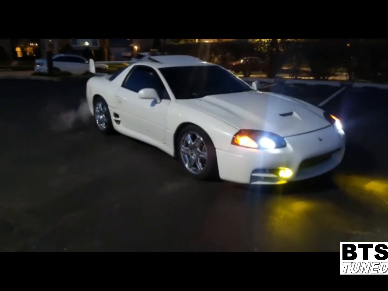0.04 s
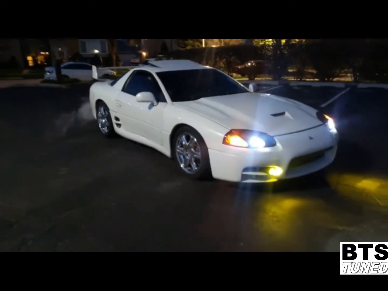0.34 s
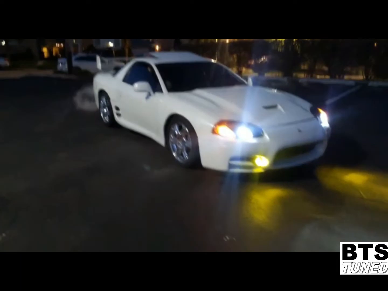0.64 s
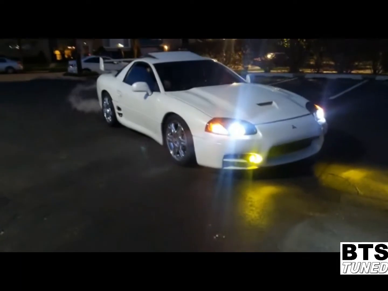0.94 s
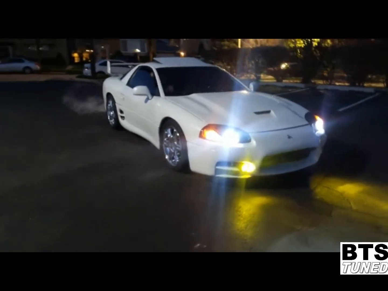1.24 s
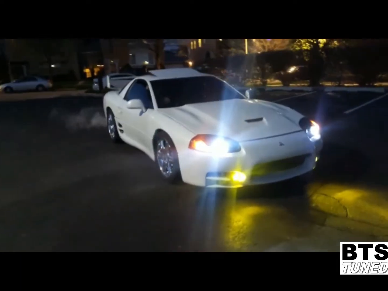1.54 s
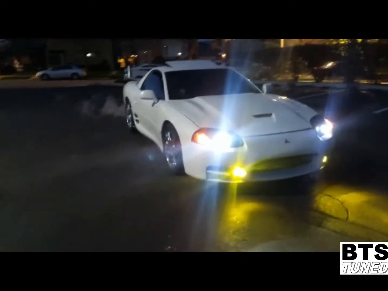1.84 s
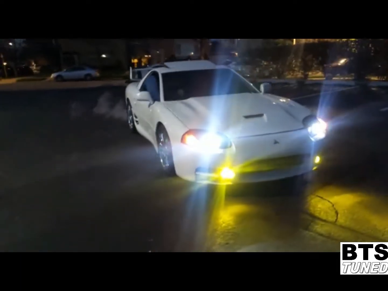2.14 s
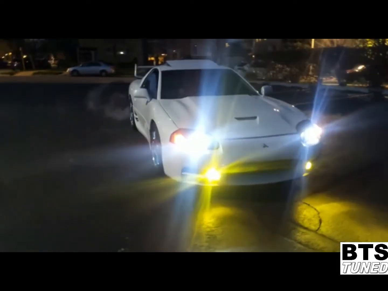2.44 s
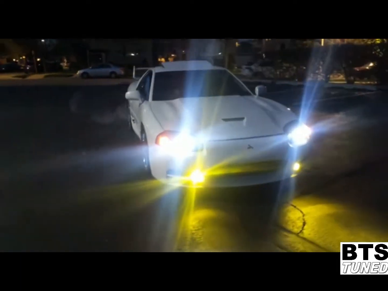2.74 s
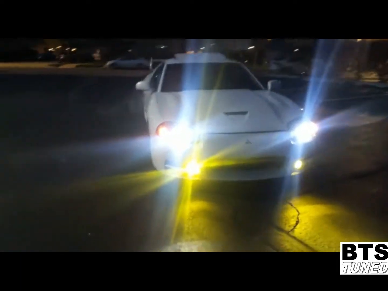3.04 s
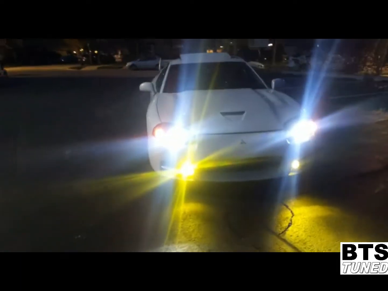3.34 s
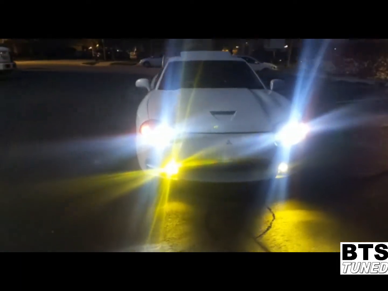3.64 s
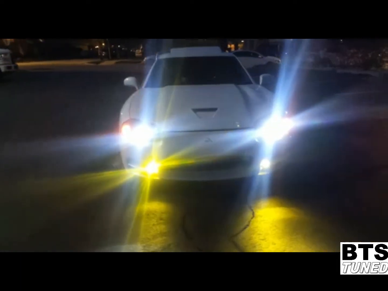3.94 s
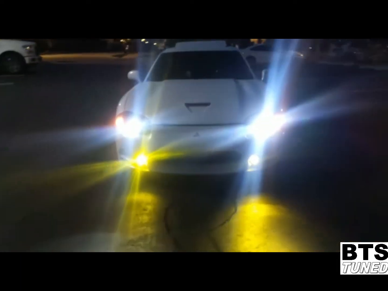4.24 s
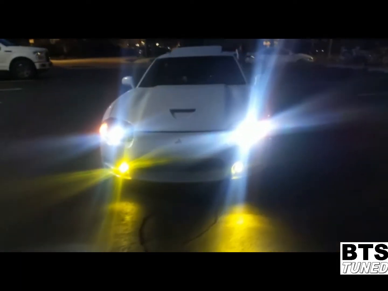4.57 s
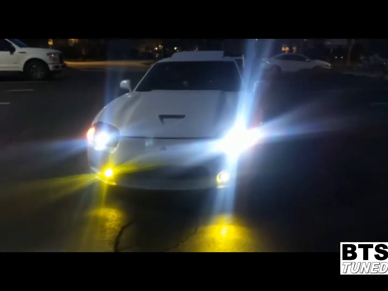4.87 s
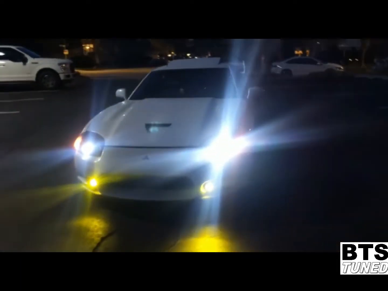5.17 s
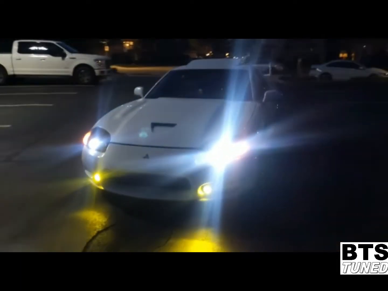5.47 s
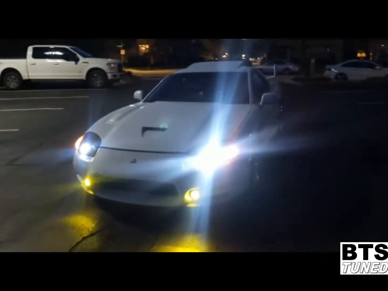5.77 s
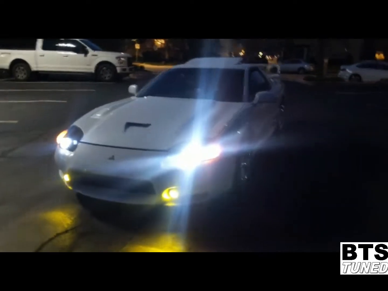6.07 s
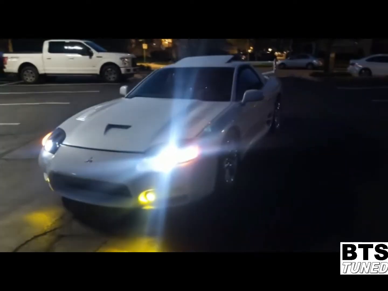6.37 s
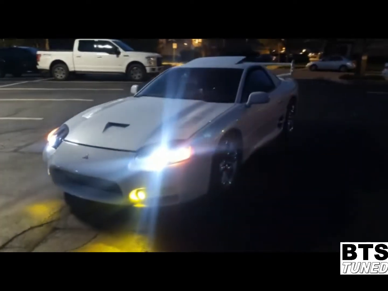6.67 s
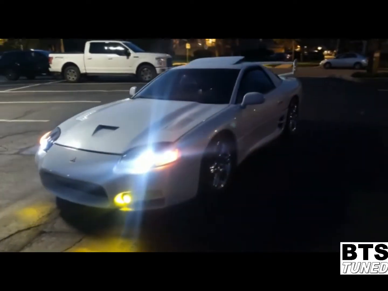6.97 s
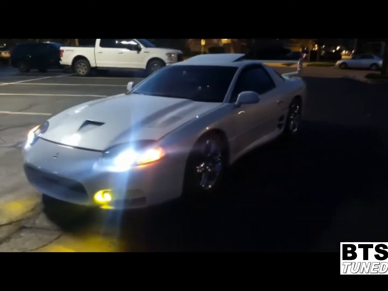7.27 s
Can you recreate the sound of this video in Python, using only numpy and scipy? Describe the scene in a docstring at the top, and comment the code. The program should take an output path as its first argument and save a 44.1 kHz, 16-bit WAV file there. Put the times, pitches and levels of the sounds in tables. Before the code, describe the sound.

A deep, throbbing exhaust drone runs throughout as a parked coupe idles in a parking lot, its speed wavering only slightly. Lighter mechanical whirring and a ticking hiss sit over the low burble. As the close microphone circles the front of the car, a dull tapping and then a faint high whistle come and go, and the boom grows a little fuller on the far side.

```python
"""The boom and lumpy burble of a turbo V6 on fast idle, warming up in a car park.
The exhaust booms at the firing rate and burbles because the two banks and six cylinders blow unequally.
Over it the engine bay rustles and taps with each crank turn, the valve gear ticks, and belts and fan
whine faintly. The tone shifts as the listener walks round the nose, from one flank to the other."""
import sys
import numpy as np
from scipy import signal
from scipy.fft import rfft, irfft
from scipy.io import wavfile
from scipy.ndimage import uniform_filter1d, map_coordinates

SR = 44100
rng = np.random.default_rng(int(sys.argv[2]) if len(sys.argv) > 2 else 0)


def transcribe(signal):
    """Save signal, clipped to [-1, 1], as a 16-bit WAV file at the path in sys.argv[1]."""
    frames = np.atleast_2d(signal).T
    limited = np.clip(frames, -1, 1)
    pcm = np.round(limited * 32767).astype(np.int16)
    wavfile.write(sys.argv[1], SR, pcm)


N = 326781
T = np.arange(N) / SR
CYLINDERS = 6

# the walk round the car: time_s, place (0 near flank, 1 nose, 2 far flank)
LISTENER_PATH = [(0, 0), (1.9, 0), (2.7, .3), (3.2, .9), (4.65, 1.05), (5.8, 2)]
# the mix at near flank, near corner, nose, far corner, far wing, far front wheel and far flank:
# time_s, firing_db, octave_db, burble_trim_db, bay_db, valve_db
SIDE_MIX = [(.8, -30, -21, 1.7, -41.5, -61.5), (2.2, -27, -22, -0.5, -40.5, -56.5),
            (4.1, -30.7, -21, 1.5, -39.5, -54.5), (5.2, -26.5, -23, -2.8, -39.5, -54),
            (5.65, -30.5, -25, 0.9, -39.5, -54.5), (6.2, -25.5, -19.5, -0.1, -40, -54),
            (7.3, -26, -19.5, 2.5, -40.5, -55)]


def exhaust(cycle, cycle_hz, waver_db=.6, waver_per_s=3.6):
    """Clean boom, lumpy burble, and the rumble of firings that are never alike."""
    # the third firing harmonic, droning on the silencer's resonance: time_s, level_db
    drone = [(0.0, -15), (0.54, -15), (0.76, -18.2), (1.15, -13.5), (1.38, -19.5), (1.5, -14),
             (2.12, -16.5), (2.17, -22.5), (2.55, -14.5), (3.48, -17.5), (3.88, -25), (4.95, -22.5),
             (5.04, -33), (5.4, -27.5), (5.54, -18.5), (5.76, -22.5), (5.94, -16), (7.41, -17.5)]
    # the pipe's response to uneven firings: frequency_hz, relative_db
    pipe_eq = [(10, -22), (35, -5.5), (70, -5.5), (110, 1), (150, 3.5), (190, -5.5), (220, -1.5),
               (280, -4.5), (335, -3), (390, -12.5), (470, -19), (700, -30.5)]
    firing_db, octave_db, *_ = curves(SIDE_MIX)
    drift_db = waver_db * wander(waver_per_s)
    harmonics_db = [firing_db + drift_db, octave_db + drift_db, curves(drone)[0]]
    boom = sum(undb(db) * pipe_harmonic(cycle, CYLINDERS * k, cycle_hz)
               for k, db in enumerate(harmonics_db, 1))
    uneven_firings = unit(pulses(CYLINDERS * cycle, rng.standard_normal(N)))
    rumble = undb(-31.5) * colour(uneven_firings + 2 * rng.standard_normal(N), pipe_eq)
    return boom + burble(cycle, cycle_hz) + rumble


def burble(cycle, cycle_hz):
    """Unequal banks and cylinders fill in between the firing harmonics; neighbours beat and throb."""
    # burble partials before the trim: {multiple of the cycle: (near_flank_db, nose_db, far_flank_db)}
    partials = { 3: (-52, -51, -51), 9: (-54, -42, -47), 13: (-43, -46, -46), 15: (-38.5, -30, -32),
                16: (-46, -45, -38), 17: (-45.5, -53, -48), 19: (-38, -45, -43), 20: (-45, -43, -40),
                21: (-48, -44, -41), 24: (-44.5, -29.5, -36), 25: (-34.5, -31.5, -34.5),
                26: (-41.5, -48, -50), 27: (-43, -38, -47), 30: (-36, -34, -35), 31: (-48, -44, -45),
                33: (-55.5, -65, -44), 36: (-45.5, -45, -49), 37: (-53, -52, -48.5),
                38: (-49.5, -58.5, -52.5), 39: (-48.5, -55.5, -50), 42: (-51.5, -53, -44.5),
                43: (-53.5, -47, -55), 45: (-48.5, -52, -59.5)}
    place = curves(LISTENER_PATH)[0]
    _, _, trim_db, *_ = curves(SIDE_MIX)
    out = 0
    for order, levels in partials.items():
        db = np.interp(place, [0, 1, 2], levels) + wander(4)
        # one bank's three firings line up in thumps; single cylinders arrive by paths of any length
        lag_cycles = rng.random() if order % (CYLINDERS // 2) else 0
        out = out + undb(db) * pipe_harmonic(cycle - lag_cycles, order, cycle_hz)
    return undb(trim_db) * out


def pipe_harmonic(cycle, order, cycle_hz, silencer_hz=151, silencer_q=1.18):
    """One exhaust harmonic of rms 1, phase-shifted by the silencer's main resonance."""
    ratio = order * cycle_hz / silencer_hz
    phase_lag = np.arctan(silencer_q * (ratio - 1 / ratio))
    # past the nose the path round the far flank takes over: upper harmonics flip, the chug smooths out
    detour = np.interp(curves(LISTENER_PATH)[0], [1, 1.4], [0, 1])
    flip = np.pi * detour if order >= 3 * CYLINDERS else 0
    return -np.sqrt(2) * np.sin(2 * np.pi * order * cycle + flip - phase_lag)


def engine_bay(cycle):
    """Belts, pistons and cams rustle in time with the crank; whines and rings pass with the walk."""
    # the bay's tone from four sides: frequency_hz, relative_db
    flank_eq = [(240, -43), (400, -21), (435, -19.5), (494, -6.5), (678, -5.5), (795, -3.5), (1190, -14.5),
                (1360, -7.5), (1760, -11), (1990, -13.5), (2260, -17.5), (2490, -16.5), (2860, -16),
                (3350, -13), (5000, -25), (6500, -50), (11000, -120)]
    corner_eq = [(240, -28), (400, -4.5), (431, 1), (543, -13), (644, 0), (731, -4), (1060, 0.5),
                 (1150, -4.5), (1610, -5), (1870, -12.5), (2220, -7), (2490, -16.5), (2800, -8.5),
                 (3570, -9.5), (5000, -27), (6500, -37.5), (11000, -120)]
    nose_eq = [(240, -42), (400, -11), (426, -0.5), (499, -4.5), (700, -6), (754, -4), (803, -2.5),
               (1230, -11), (1550, -4.5), (1870, -15), (2120, -8.5), (2460, -18.5), (2770, -10.5),
               (3530, -10), (5000, -26.5), (6500, -62), (11000, -120)]
    far_corner_eq = [(240, -20), (400, -1), (579, -10), (657, -4.5), (856, -9), (912, -5.5), (1050, -5.5),
                     (1390, -14.5), (1650, -9), (2040, -16), (2620, -19.5), (2920, -14), (3310, -16.5),
                     (3800, -15), (5000, -37.5), (6500, -54.5), (11000, -120)]
    # belt-driven parts: multiple of the cycle, relative_db, loudest_s, spread_s
    whines = [(238.7, -16, 0.34, 1), (239.5, -21.5, 4.1, 1), (97.6, -14, 0.5, .8), (125.8, -20, 5, 6.6)]
    # narrow resonances of the bay: pitch_hz, width_hz, relative_db, loudest_s, spread_s
    rings = [(2910, 37, -14, 2.3, 0.52), (2870, 43, -19, 5.3, 0.63), (1560, 66, -10, 3.76, 1.1),
             (3420, 170, -9, .75, 0.48), (790, 150, -4.5, 0.46, 0.66), (4170, 100, -18, 3, 1.6),
             (5510, 280, -18.5, 1.1, 1), (3900, 170, -16.5, 4.9, 0.39), (1065, 8.7, -12.5, 1.9, 0.44),
             (1060, 8, -12, 7.1, .25), (7400, 400, -25, 4.8, 1.5)]
    *_, bay_db, _ = curves(SIDE_MIX)
    crank = np.sin(2 * np.pi * cycle) ** 8
    firing = np.sin(np.pi * CYLINDERS * cycle) ** 2
    rustle = (1 + 0.28 * crank + 0.24 * firing) * rng.standard_normal(N)
    side_eqs = [flank_eq, corner_eq, nose_eq, far_corner_eq]
    facing_s = [row[0] for row in SIDE_MIX[:4]]  # past the far corner the EQ holds
    crossfades = [np.interp(T, facing_s, share) for share in np.eye(4)]
    out = undb(-0.06) * unit(sum(fade * colour(rustle, eq) for fade, eq in zip(crossfades, side_eqs)))
    for order, db, loudest_s, spread_s in whines:
        belt_creep = 0.2 * wander(25)
        whine = unit(np.sin(2 * np.pi * (order * cycle + belt_creep)))
        out = out + undb(db + 2 * wander(13)) * passing(loudest_s, spread_s) * whine
    for hz, width_hz, db, loudest_s, spread_s in rings:
        ring = signal.lfilter(*signal.iirpeak(hz, hz / width_hz, fs=SR), rng.permutation(rustle))
        out = out + undb(db) * passing(loudest_s, spread_s) * unit(ring)
    return undb(bay_db) * out


def knock(cycle, level_db=-51, decay_s=.007, scatter_db=1, weaker_db=-1):
    """A dull mechanical tap once a crank turn, strong and weak in turn, clearest on nearing the nose."""
    # the tap's tone: frequency_hz, relative_db
    block_eq = [(450, -15), (750, -1), (1050, -2.0), (1600, -6.5), (2300, -15.5)]
    accents_db = np.resize([0, weaker_db], N) + scatter_db * rng.standard_normal(N)
    taps = decay(pulses(2 * cycle + .5, undb(accents_db)), decay_s)
    return undb(level_db) * passing(3.0, 1.5) * colour(taps * rng.standard_normal(N), block_eq)


def valve_gear(cycle, panel_delay_s=1 / 1910, echo_gain=0.19, scatter_db=3.5, decay_s=0.011):
    """Twelve ticks a cycle in a fine hiss, combed by a close reflection."""
    # the sizzle of valves and injectors: frequency_hz, relative_db
    valve_eq = [(3200, -21.5), (4300, -2), (5000, -2.5), (5700, -1), (6600, -8.5), (7600, -5.5),
                (9700, -11), (10600, -20), (14000, -26.5)]
    *_, valve_db = curves(SIDE_MIX)
    strengths = undb(scatter_db * rng.standard_normal(N))
    ticks = decay(pulses(2 * CYLINDERS * cycle, strengths), decay_s)
    crank = -np.cos(2 * np.pi * 2 * cycle)
    hiss = (1 + 0.74 * ticks + 0.13 * crank) * rng.standard_normal(N)
    hiss = hiss + echo_gain * np.interp(T - panel_delay_s, T, hiss)
    return undb(valve_db + 0.86 * wander(13)) * colour(hiss, valve_eq)


def cooling_fan():
    """Faint blade tones that keep their pitch whatever the engine does."""
    # the fan's hum: pitch_hz, level_db
    tones = [(431, -56.5), (822, -61.5), (900, -62), (941, -60), (1061, -60.5), (1138, -66.5),
             (1175, -65.5), (1371, -64)]
    wobbly_time = np.cumsum(1 + 0.001965 * wander(5)) / SR
    return sum(undb(db + 2.5 * wander(2.8)) * unit(np.sin(2 * np.pi * hz * wobbly_time))
               for hz, db in tones)


def whistle():
    """A thin whistle, likely intake air, heard only in front of the nose."""
    pitch_hz = 3577 + 4 * wander(15)
    tone = unit(np.sin(2 * np.pi * np.cumsum(pitch_hz) / SR))
    return undb(-54 + 1.5 * wander(10)) * passing(4.15, .65) * tone


def ground_bounce(x, delay_s=.0024, bounce_gain=0.11):
    """The asphalt adds a late copy; its comb slides as the listener sways and walks."""
    place = curves(LISTENER_PATH)[0]
    lag_s = delay_s * (1 + 0.204 * np.sin(np.pi * place / 2) + 0.036 * wander(1.5))
    late = map_coordinates(x, [(T - lag_s) * SR], order=3)
    return (x + bounce_gain * late) / np.hypot(1, bounce_gain)


def undb(db):
    """Decibels to gain."""
    return 10 ** (np.asarray(db) / 20)


def unit(x):
    """Scale to rms 1."""
    return x / np.sqrt(np.mean(x ** 2))


def curves(table):
    """Each column of a time table as an automation curve."""
    time_s, *columns = np.transpose(table)
    return [np.interp(T, time_s, column) for column in columns]


def colour(x, eq, size=16384):
    """Minimum-phase EQ through (frequency_hz, relative_db) points; output at rms 1."""
    hz, db = np.transpose(eq)
    bins_hz = np.maximum(np.arange(size // 2 + 1) * SR / size, 1)
    octaves_outside = np.maximum(np.log2(hz[0] / bins_hz), 0) + np.maximum(np.log2(bins_hz / hz[-1]), 0)
    response_db = np.interp(np.log(bins_hz), np.log(hz), db) - np.minimum(40 * octaves_outside, 60)
    cepstrum = irfft(np.log(undb(response_db)))
    cepstrum[1:] *= 2
    cepstrum[size // 2:] = 0
    impulse = irfft(np.exp(rfft(cepstrum)))[:4096]
    return unit(signal.oaconvolve(x, impulse)[:N])


def wander(per_s):
    """Glides between random levels, per_s of them a second; rms 1."""
    hold = max(int(SR / per_s), 1)
    steps = np.repeat(rng.standard_normal(N // hold + 1), hold)
    return unit(uniform_filter1d(steps, hold)[:N])


def pulses(phase, sizes):
    """One pulse of the next size each time the phase passes a whole number."""
    at = np.flatnonzero(np.diff(np.floor(phase)))
    out = np.zeros(N)
    out[at] = sizes[:len(at)]
    return out


def decay(hits, decay_s):
    """Give each pulse an exponential tail."""
    return signal.lfilter([1], [1, -np.exp(-1 / (decay_s * SR))], hits)


def passing(loudest_s, spread_s):
    """Bell-shaped swell of a part as the listener passes it."""
    return np.exp(-.5 * ((T - loudest_s) / spread_s) ** 2)


def scene():
    """One crankshaft drives every layer but the fan and the whistle."""
    # the idle, hunting a little: time_s, firing_hz
    idle_speed = [(0.0, 49.5), (0.32, 50.93), (0.7, 49.52), (1.13, 50.67), (1.31, 49.67), (1.54, 50.57),
                  (2.23, 49.71), (2.95, 51.34), (2.98, 50.3), (3.5, 50.74), (3.7, 51.8), (4.35, 52.58),
                  (4.79, 50.12), (5.11, 48.29), (5.48, 50.04), (5.76, 49.2), (5.87, 51.22), (7.41, 50.75)]
    cycle_hz = curves(idle_speed)[0] / CYLINDERS
    # counts four-stroke cycles, two crank turns each
    cycle = np.cumsum(cycle_hz * (1 + 0.0013 * wander(20))) / SR + 1 / 8
    mechanics = engine_bay(cycle) + knock(cycle) + valve_gear(cycle)
    return (exhaust(cycle, cycle_hz) + ground_bounce(mechanics) + cooling_fan() + whistle())[None]


def record(dry, top_hz=14250):
    """A steep low-pass trims the very top."""
    return signal.sosfilt(signal.ellip(8, .2, 70, top_hz, fs=SR, output="sos"), dry)


dry = scene()
out = record(dry)
transcribe(out)
```